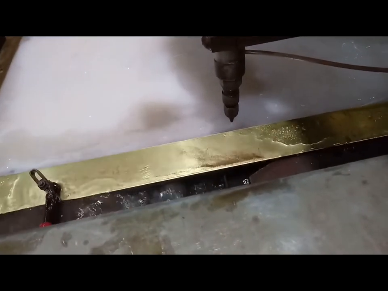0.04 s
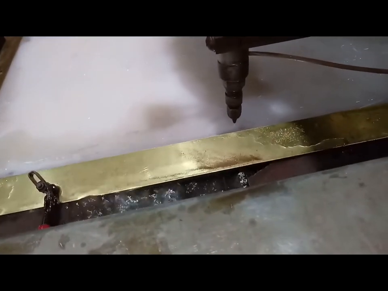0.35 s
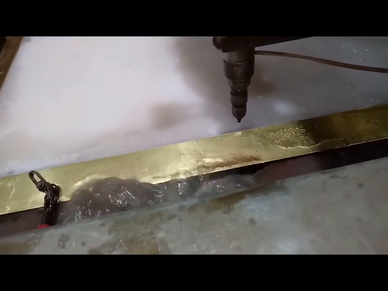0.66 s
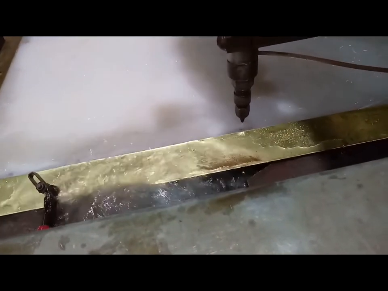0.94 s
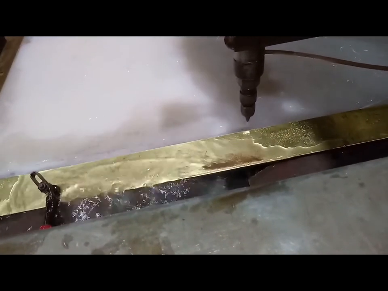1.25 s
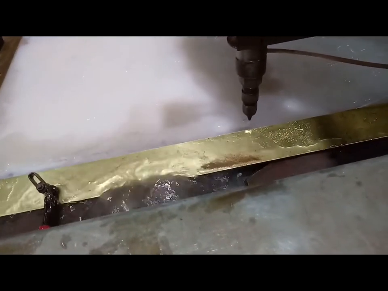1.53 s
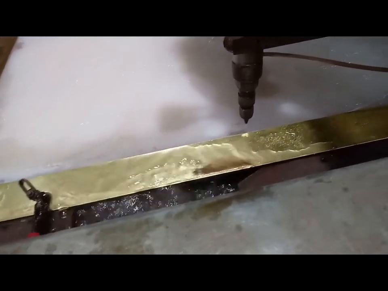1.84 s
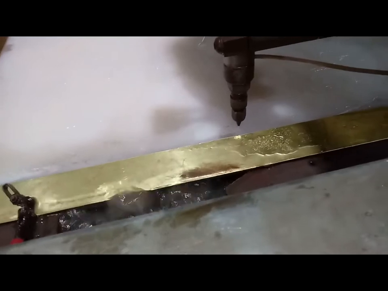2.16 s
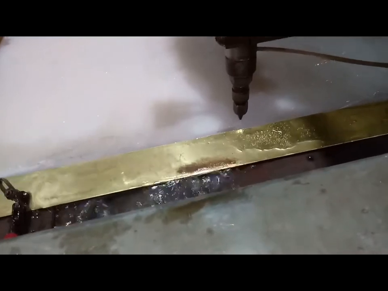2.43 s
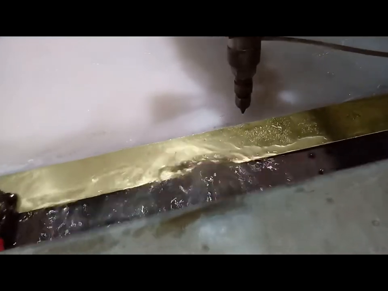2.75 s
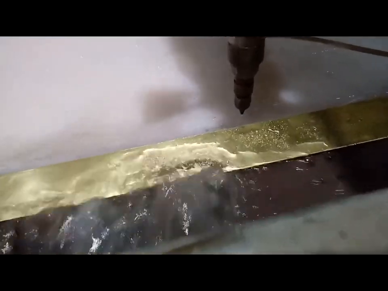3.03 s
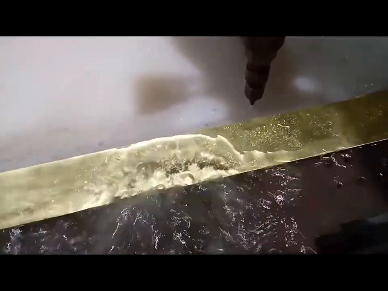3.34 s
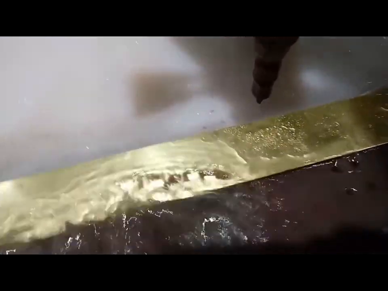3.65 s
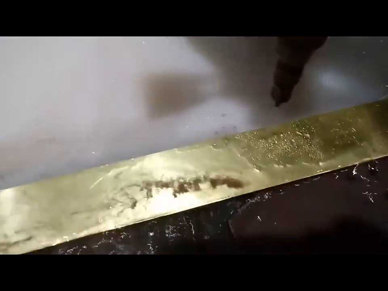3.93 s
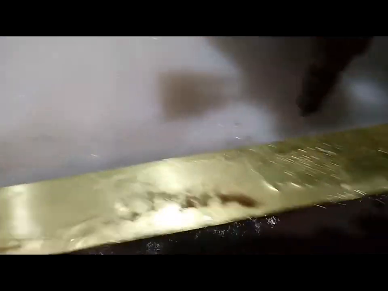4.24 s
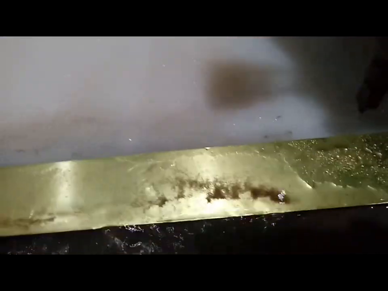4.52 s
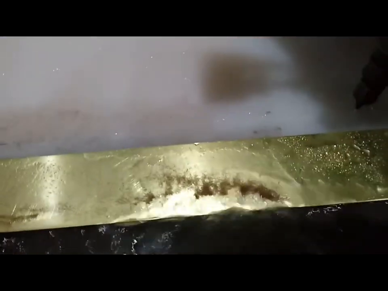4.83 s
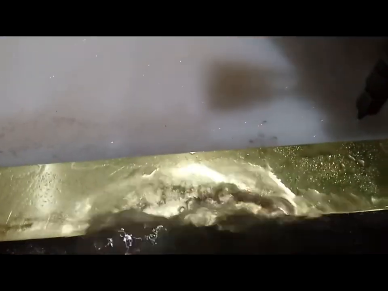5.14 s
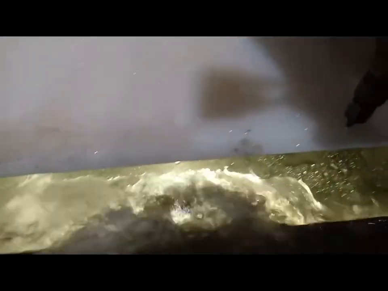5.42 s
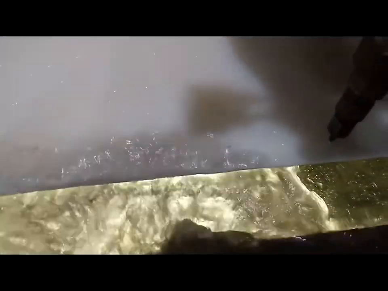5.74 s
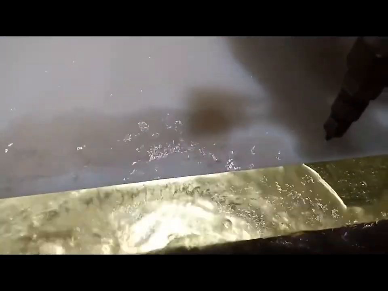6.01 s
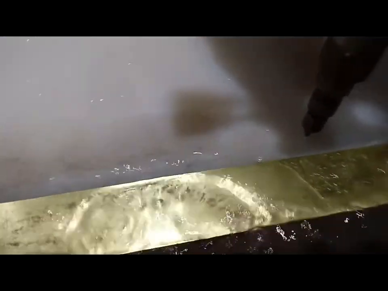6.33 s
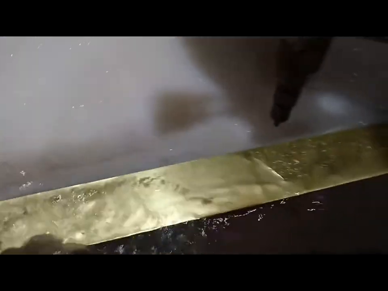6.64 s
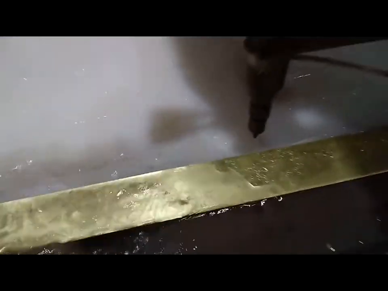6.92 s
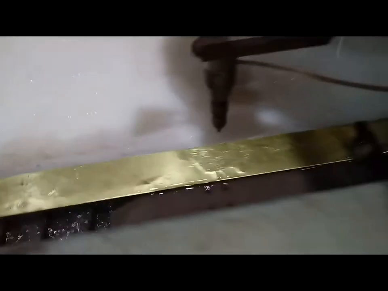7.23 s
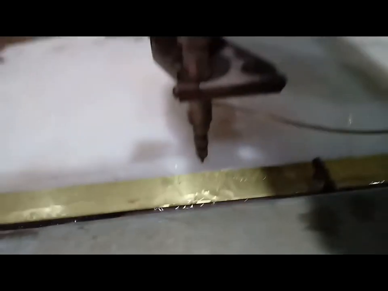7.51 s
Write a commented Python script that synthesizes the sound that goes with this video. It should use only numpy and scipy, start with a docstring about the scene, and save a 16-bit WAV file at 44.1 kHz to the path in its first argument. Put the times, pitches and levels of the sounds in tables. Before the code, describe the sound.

A piercing, slightly ringing hiss comes from a jet of water cutting through brass. At first it rasps, flares and spits as water floods the cut. After about three and a half seconds it swells and turns smoother as the microphone closes in, dipping briefly near six seconds. Sizzling spray, the low churn of a tank and a faint pump hum continue throughout, with short reflections off nearby surfaces.

```python
"""Waterjet cutting brass

A jet of water and grit cuts a brass strip over a tank, heard from an arm's length and then closer.
The jet hisses and rings in the slot it cuts, rasps on the metal, spits, and splutters where water
floods the cut; spray patters under a thin, very high sizzle. The tank churns and a pump drones.
The strip and the cutting head throw back short echoes that shift as the listener moves."""
import sys
import numpy as np
from scipy import signal
from scipy.fft import rfft, irfft, next_fast_len
from scipy.io import wavfile
from scipy.ndimage import uniform_filter1d, minimum_filter1d

SR = 44100
rng = np.random.default_rng(int(sys.argv[2]) if len(sys.argv) > 2 else 0)


def log_audio(samples):
    """Write samples as a 16-bit WAV file to the path given in sys.argv[1]."""
    # one column per channel
    frames = np.atleast_2d(samples).T
    # limit to full scale, then quantise
    limited = np.clip(frames, -1, 1)
    pcm = np.round(limited * 32767).astype(np.int16)
    wavfile.write(sys.argv[1], SR, pcm)


N = 333837
TIME = np.arange(N) / SR


def from_db(db):
    """Turn decibels into a factor to multiply by."""
    return 10 ** (np.asarray(db) / 20)


def unit_level(x):
    """Scale a sound to an average (rms) level of 1."""
    return x / np.sqrt(np.mean(x ** 2) + 1e-20)


def between(far, near, closeness):
    """Blend from far (closeness 0) to near (closeness 1)."""
    return far + (near - far) * closeness


def curves(rows):
    """Join a table's points with straight lines: one curve for each column after the time."""
    times, *columns = np.transpose(rows)
    return [np.interp(TIME, times, column) for column in columns]


def swells(rows, edge_s):
    """Add up events (start, length, dB, ...) that rise, hold and fall: one curve per dB column."""
    out = 0
    for start, length, *db in rows:
        inside_s = np.minimum(TIME - start, start + length - TIME)
        out = out + np.outer(db, np.clip(0.5 + inside_s / edge_s, 0, 1))
    return out


def coloured(x, points):
    """Shape a sound's tone by (Hz, dB) points, fading 40 dB per octave beyond them; level 1."""
    hz, db = np.transpose(points)
    octave = np.log2(np.arange(N // 2 + 1) * SR / N + 1)
    known = np.log2(hz)
    outside = np.abs(octave - np.clip(octave, known[0], known[-1]))
    gain = from_db(np.interp(octave, known, db) - 40 * outside)
    size = next_fast_len(N, True)
    gain = np.interp(np.linspace(0, 1, size // 2 + 1), np.linspace(0, 1, len(gain)), gain)
    return unit_level(irfft(rfft(x, size) * gain, size)[:N])


def drift(rate_hz):
    """A smooth random wobble, about 1 in size."""
    step, warm_up = 20, 4000
    r = np.exp(-2 * np.pi * rate_hz * step / SR)
    noise = rng.standard_normal(N // step + warm_up + 2)
    slow = signal.lfilter([1], [1, -2 * r, r * r], noise)[warm_up:]
    return np.interp(np.arange(N) / step, np.arange(len(slow)), unit_level(slow))


def turbulence(rough_db, rate_hz):
    """Noise whose level wobbles, as in swirling water."""
    return unit_level(rng.standard_normal(N) * from_db(rough_db * drift(rate_hz)))


def impacts(per_s, spread_db):
    """Random clicks, a few of them much larger than the rest."""
    sizes = from_db(spread_db * np.minimum(rng.exponential(1, N), 4))
    return unit_level(sizes * rng.choice([-1, 1], N) * (rng.random(N) < per_s / SR))


def resonance(x, hz, width_hz, block=256):
    """Keep only a band around one pitch, which may move from block to block."""
    r = np.exp(-np.pi * width_hz / SR)
    tuning = -2 * r * np.cos(2 * np.pi * np.broadcast_to(hz, N) / SR)
    out, state = np.zeros(N), np.zeros(2)
    for i in range(0, N, block):
        part = slice(i, i + block)
        out[part], state = signal.lfilter([1, 0, -1], [1, tuning[i], r * r], x[part], zi=state)
    return out * (1 - r * r) / 2


def bubbles(low_hz, high_hz, per_s, cycles, spread_db, pitches=24):
    """Bubbles of many sizes burst at random; each rings, fading 60 dB over the given cycles."""
    clicks = impacts(per_s, spread_db)
    which_pitch = rng.integers(0, pitches, N)
    out = 0
    for k, hz in enumerate(np.geomspace(low_hz, high_hz, pitches)):
        r = from_db(-60 * hz / (cycles * SR))
        tuning = -2 * r * np.cos(2 * np.pi * hz / SR)
        bursts = clicks * (which_pitch == k) + 1e-18
        out = out + signal.lfilter([1 - r, 0, r - 1], [1, tuning, r * r], bursts)
    return unit_level(out)


def delayed(x, delay_ms):
    """The same sound a little later; the delay may change."""
    n = np.arange(N)
    return np.interp(n - delay_ms * SR / 1000, n, x, left=0)


def wall_echoes(x, sway_ms=0.162):
    """Nearby surfaces add echoes that slide as the listener sways."""
    # echoes off the tank walls and the machine's frame: delay/ms, share of the direct sound
    walls = [(2.1, 0.11), (2.9, 0.15), (4.2, 0.1), (5.6, 0.08), (7.7, 0.18), (13.3, .10)]
    echoes = 0
    for delay_ms, share in walls:
        slide_ms = sway_ms * np.sqrt(delay_ms / 2) * drift(0.25)
        echoes = echoes + share * delayed(x, delay_ms + slide_ms)
    return (x + echoes) * from_db(-0.5)


def head_echo(x, delay_ms, share=0.08):
    """The path by way of the cutting head changes length, which slowly sweeps the tone."""
    return x + share * delayed(x, delay_ms)


def strip_echo(x, delay_ms, share):
    """A short, upside-down echo off the strip weakens some pitches and lifts others."""
    return (x - share * delayed(x, delay_ms)) / np.sqrt(1 + share ** 2)


def ringing_hollows(x, edge_s=0.068):
    """Water opens and closes hollows in and under the cut; each lifts a narrow band while open."""
    # open hollows: start/s, end/s, first f/Hz, last f/Hz, lift/dB
    hollows = [(0.1, 0.44, 3000, 2850, 6), (-.1, 0.352, 4280, 4050, 4), (0.524, .74, 4830, 5030, 6.5),
               (1, 1.15, 2620, 2620, 7.5), (2.08, 2.3, 2710, 2500, 8.5), (3.107, 4.05, 2780, 3650, 3.5),
               (3.12, 3.44, 5140, 5450, 7), (5, 5.9, 3550, 3650, 2.5), (4.1, 6.0, 134, 146, 3.2),
               (4.402, 5.25, 1070, 1030, 6), (4.402, 5.1, 1290, 1300, 7), (4.5, 5.4, 6900, 7050, 4.5),
               (4.197, 5.8, 8400, 8070, 6), (5.45, 6.4, 1930, 1680, 5.2), (5.3, 6.35, 5250, 5550, 4.5),
               (6.41, 7.054, 6500, 6660, 5), (6.548, 7.6, 230, 233, 6), (6.997, 7.45, 6900, 7050, 3),
               (7.033, 7.6, 4500, 4550, 6)]
    out = x
    for start, end, first_hz, last_hz, lift_db in hollows:
        opening = np.clip(np.minimum(TIME - start, end - TIME) / edge_s, 0, 1)
        hz = np.interp(TIME, [start, end], [first_hz, last_hz])
        band = resonance(x, hz, width_hz=15 + first_hz / 18, block=1024)
        out = out + (from_db(lift_db) - 1) * opening * band
    return out


def pump(hz=82.4, waver_hz=3.3, level_db=-53.5):
    """The pump drones on one low, unsteady note."""
    phase = 2 * np.pi * np.cumsum(hz + waver_hz * drift(9)) / SR
    throb = 1 + 0.55 * drift(8)
    return from_db(level_db) * unit_level(np.sin(phase) * throb)


def tank(closeness, rumble_lull_db, slosh_lull_db, drained):
    """The spent jet churns the tank: bubbles slosh on top and large air pockets rumble below."""
    # tone of the slosh and of the rumble: f/Hz, level/dB
    slosh_tone = [(230, -22), (350, -9.5), (420, -1), (500, 1), (565, -2), (630, 2.5), (720, -2), (820, -4),
                  (1000, -7.5), (1500, -21)]
    rumble_tone = [(20, -18), (45, -24), (68, -21), (100, -7.5), (140, 0), (160, -1), (180, -1.5), (238, 1),
                   (280, -1.5), (380, -9.5), (600, -12)]
    slosh_db = between(-37, -37.5, closeness) - slosh_lull_db - 3.8 * drained + 0.7 * drift(4.5)
    rumble_db = between(-37.5, -37, closeness) - rumble_lull_db - 1.2 * drained + 0.9 * drift(4.6)
    slosh = rng.standard_normal(N) + 0.49 * bubbles(326.5, 1098, per_s=450, cycles=23.4, spread_db=1.5)
    rumble = coloured(rng.standard_normal(N), rumble_tone)
    return coloured(slosh, slosh_tone) * from_db(slosh_db) + rumble * from_db(rumble_db)


def spray(flicker):
    """Droplets patter thickly on the metal, and a thin, very high sizzle sits above them."""
    # how loud the two are: t/s, relative droplet level/dB, relative sizzle level/dB
    levels = [(0.0, -35.5, -33), (0.55, -41, -42), (0.59, -36, -34), (0.82, -41, -44), (0.95, -41, -40),
              (1.62, -38.5, -37), (1.94, -43, -42), (1.96, -38.5, -38), (2.74, -41.5, -43),
              (3.98, -36, -40), (4.34, -33.5, -36), (4.51, -32, -38), (6.28, -31, -41), (6.89, -32.5, -34),
              (7.25, -39.5, -43), (7.57, -38, -45)]
    # tone of the droplets and of the sizzle: f/Hz, level/dB
    drop_tone = [(7400, -12), (8200, 3), (8700, -1.5), (9600, 1.5), (10400, -2), (11400, -2), (12500, -5),
                 (13800, -9), (15500, -8)]
    sizzle_tone = [(13500, -28), (14100, -7), (14700, 3), (15300, 1), (16000, -3)]
    drop_db, sizzle_db = curves(levels)
    patter = turbulence(rough_db=1.37, rate_hz=15) + 0.5 * impacts(per_s=2200, spread_db=4.5)
    drops = coloured(patter, drop_tone) * from_db(drop_db + 0.1)
    top_sizzle = coloured(turbulence(rough_db=1.6, rate_hz=26), sizzle_tone) * from_db(sizzle_db + 2)
    return (drops + top_sizzle) * from_db(0.55 * flicker)


def spits(attack_s=0.0035, ring_share=0.22):
    """A slug of water is torn up in the cut: a burst of noise that rings at one pitch and dies away."""
    # spits: t/s, level before fading/dB, f/Hz, fade time/s
    bursts = [(0, -17, 3100, .05), (0.01, -24, 1910, 0.09), (0.214, -20.5, 2200, 0.059),
              (0.281, -16, 4150, 0.046), (.472, -13.5, 3360, 0.02), (0.572, -19, 4950, .06),
              (0.632, -22, 1750, 0.066), (0.858, -12.5, 2900, 0.024), (0.93, -14.5, 3980, 0.1),
              (1.042, -19.5, 2780, .045), (1.387, -16.5, 4100, 0.059), (2.363, -20, 3500, 0.039),
              (3.208, -23, 2780, 0.034), (3.325, -15, 4480, 0.041), (4.187, -27, 2150, .03),
              (6.44, -31, 1300, .02), (7.136, -19.5, 4560, .035)]
    out = 0
    for start, level_db, hz, fade_s in bursts:
        band = resonance(rng.standard_normal(N), hz, width_hz=hz / 2, block=N)
        band = resonance(band, hz, width_hz=hz / 2, block=N)   # twice, for steeper sides
        ring = resonance(band, hz, width_hz=150, block=N)
        spit = unit_level(unit_level(band) + ring_share * unit_level(ring))
        age = np.maximum(TIME - start, 0)
        rise = 1 - np.exp(-age / attack_s)
        fall = np.exp(-np.minimum(age / fade_s, 20) ** 2)
        out = out + spit * from_db(level_db) * rise * fall
    return out


def cut(closeness, drained):
    """Grit rasps on the brass, and water flooding the cut splutters in short bubbles."""
    # water floods the cut: start/s, length/s, splutter lift/dB
    floods = [(-0.05, 0.38, 10.5), (0.33, 0.22, 4.5), (0.55, 0.16, 11), (0.71, 0.33, 5), (1.63, 0.71, 8.5),
              (2.35, 0.534, 5), (3.2, 0.16, 3.5), (3.85, 0.37, 4.5)]
    # tone of the rasp from afar, of the rasp close by and of the splutter: f/Hz, level/dB
    far_tone = [(1500, -24), (2200, -7.5), (2700, -4), (3150, -1), (3600, -1.5), (4200, 1), (4800, 0),
                (5600, -8.5)]
    near_tone = [(1500, -7.5), (2200, -7), (2700, -2), (3200, -7), (3650, 0), (4000, 1), (4700, 4),
                 (5600, -16)]
    splutter_tone = [(600, -6), (900, -6), (1200, -2), (1500, -2), (1850, -2), (2300, -2.5), (3200, -8.5)]
    flood_db = swells(floods, edge_s=0.062)[0]
    flow = drift(15.4)   # rasp and splutter follow the same surges of water
    # the power of 2.9 keeps the rasp strong until the listener is very close
    rasp_db = between(-22.5, -30, closeness ** 2.9) + 0.23 * flood_db + 0.91 * flow
    splutter_db = between(-37, -35, closeness) + flood_db + 1.3 * flow
    grit = turbulence(rough_db=0.8, rate_hz=21)
    grit += 0.6 * bubbles(2270, 5060, per_s=2200, cycles=23, spread_db=2.5)
    froth = turbulence(rough_db=-0.7, rate_hz=60)
    froth += 0.49 * bubbles(806, 2890, per_s=1500, cycles=24, spread_db=2.5)
    rasp = between(coloured(grit, far_tone), coloured(grit, near_tone), closeness) * from_db(rasp_db)
    splutter = coloured(froth, splutter_tone) * from_db(splutter_db)
    return (rasp + splutter) * from_db(-1.6 * drained)


def jet(closeness, flicker, lull_db, choke_s=0.051, choke_db=1, edge_s=0.018):
    """The jet hisses, chokes briefly and flares as it breaks through; its slot adds a wandering note."""
    # the hiss before flares, lulls and flicker: t/s, level/dB
    base_level = [(0, -17), (1.5, -17.5), (1.75, -17.5), (2.75, -17), (3.3, -15.5), (3.62, -11.5),
                  (4.27, -14.5), (4.45, -12), (5.7, -13.6), (6.6, -13.5), (6.85, -16), (7.22, -12),
                  (7.57, -17.5)]
    # flares: start/s, length/s, lift/dB
    flares = [(-0.02, 0.11, 3), (0.198, 0.04, 3), (0.548, 0.068, 2.5), (0.9, 0.11, 6.5), (1.2, 0.21, 2),
              (1.583, 0.038, 3), (2.96, 0.027, 2), (3.052, 0.078, 2.5), (3.94, 0.028, 4),
              (5.904, 0.15, 1.5), (6.48, 0.023, 1.5), (7.045, 0.027, 3)]
    # tone of the hiss from afar and close by: f/Hz, level/dB
    far_tone = [(3800, -20), (4500, -13), (4860, -2), (5200, -6.5), (5600, 2), (6050, 0.5), (6800, -0.5),
                (7300, -4), (7650, -12.5), (8100, -22.5), (8700, -23.5), (10000, -37)]
    near_tone = [(3000, -32), (3900, -20), (4500, -15), (5300, -4.5), (5900, -0.5), (6400, 1.5),
                 (7100, 0.5), (7400, -7), (7800, -14.5), (8300, -27), (9000, -31), (10000, -47)]
    # the slot's note, which twice glides upward: t/s, f/Hz
    slot_note = [(0, 6100), (3.37, 6100), (3.62, 6540), (4.34, 6400), (4.53, 6050), (6.09, 6130),
                 (7.25, 6680), (7.57, 6200)]
    chokes = [(start - choke_s, choke_s, choke_db) for start, _, _ in flares]
    level_db = curves(base_level)[0] + swells(flares, edge_s)[0] - swells(chokes, edge_s)[0] - lull_db
    noise = turbulence(rough_db=1.5, rate_hz=250)
    hiss = between(coloured(noise, far_tone), coloured(noise, near_tone), closeness)
    hiss = hiss + 0.51 * resonance(hiss, curves(slot_note)[0], width_hz=280)
    steady_hiss = hiss / np.sqrt(uniform_filter1d(hiss ** 2, size=8000))
    return steady_hiss * from_db(level_db + 0.97 * flicker)


def scene(drain_start_s=5.78, drain_s=1.0):
    """Mix the sources and their echoes; all comes from one spot, the same in both ears."""
    # the moving listener: t/s, closeness (0 to 1), strip echo delay/ms, cutting head echo delay/ms
    listener = [(0, 0.05, 0.94, 1.26), (1.4, 0, 0.84, 1.43), (2.95, 0.13, 1.02, 1.48),
                (3.45, 0.4, 0.74, 1.55), (4.17, 0.52, 0.74, 1.64), (4.38, 1, 0.76, 1.7),
                (5.2, 0.96, 0.765, 1.63), (6.0, 0.89, 0.735, 1.6), (6.6, 0.97, 0.755, 1.58),
                (7.1, 0.96, 0.77, 1.7), (7.57, 1, 0.71, 1.55)]
    # the tank churns less: start/s, length/s, rumble drop/dB, slosh drop/dB, hiss drop/dB
    lulls = [(0.35, 0.4, 3.5, -0.5, 0), (0.92, 0.096, 6, 2.5, -1), (1.22, 0.19, 5.5, 0.5, 0),
             (2.45, 0.4, 3, -0.5, 0), (6.052, 0.31, 7, 6, 3.5), (6.5, 0.15, 3, 1, -0.5)]
    closeness, strip_ms, head_ms = curves(listener)
    rumble_lull_db, slosh_lull_db, hiss_lull_db = swells(lulls, edge_s=0.13)   # below 0 is a lift
    drained = np.clip((TIME - drain_start_s) / drain_s, 0, 1)   # water runs off the cut near the end
    flicker = drift(34)   # the uneven feed of grit shakes hiss and spray together
    above = jet(closeness, flicker, hiss_lull_db) + cut(closeness, drained) + spits() + spray(flicker)
    above = strip_echo(above, delay_ms=1.24, share=0.08 * closeness)   # off the strip's far edge
    above = strip_echo(above, strip_ms, share=between(0.07, 0.23, closeness))
    above = head_echo(above, head_ms)
    below = tank(closeness, rumble_lull_db, slosh_lull_db, drained)
    mix = wall_echoes(ringing_hollows(above + below)) + pump()
    return np.tile(mix, (2, 1))


def record(dry, ceiling=0.79, cutoff_hz=15800):
    """Turn the loudest peaks down quickly, then cut off the very highest treble."""
    safe_gain = np.minimum(1, ceiling / (np.abs(dry).max(axis=0) + 1e-9))
    smooth_gain = uniform_filter1d(minimum_filter1d(safe_gain, size=129), size=129)
    treble_cut = signal.ellip(12, 0.1, 90, cutoff_hz, fs=SR, output="sos")
    return signal.sosfilt(treble_cut, dry * smooth_gain)


dry = scene()
out = record(dry)
log_audio(out)
```